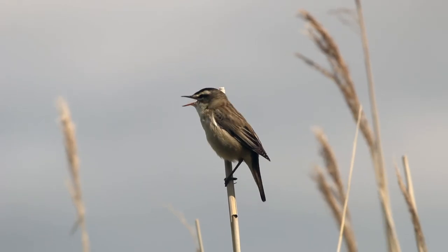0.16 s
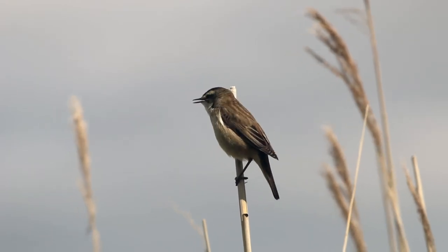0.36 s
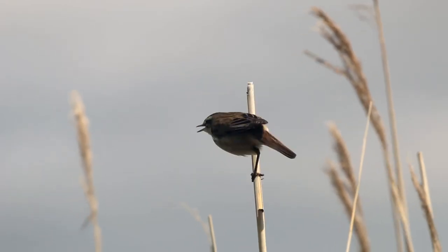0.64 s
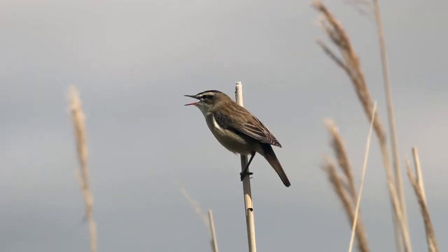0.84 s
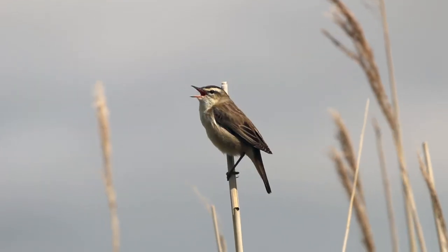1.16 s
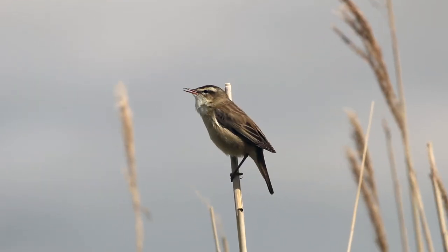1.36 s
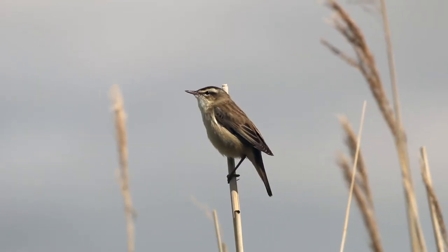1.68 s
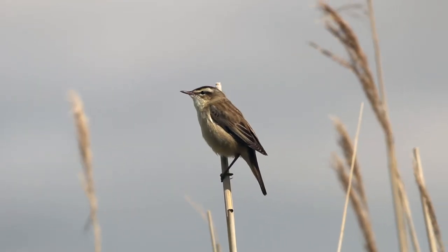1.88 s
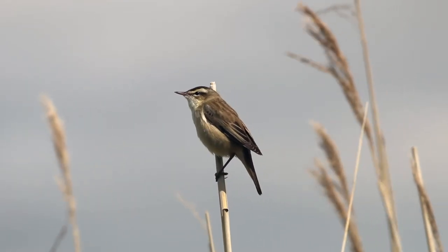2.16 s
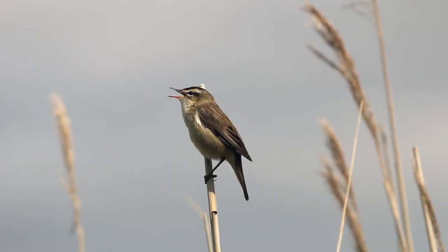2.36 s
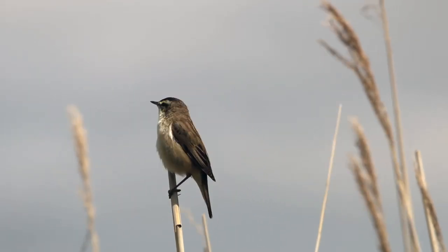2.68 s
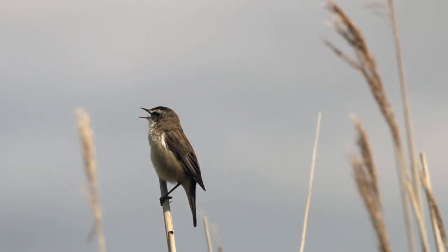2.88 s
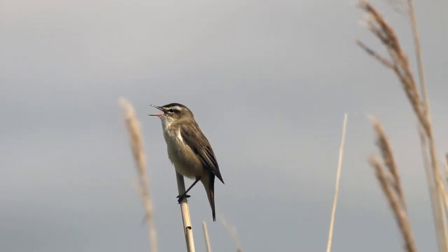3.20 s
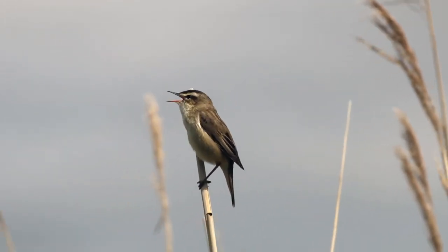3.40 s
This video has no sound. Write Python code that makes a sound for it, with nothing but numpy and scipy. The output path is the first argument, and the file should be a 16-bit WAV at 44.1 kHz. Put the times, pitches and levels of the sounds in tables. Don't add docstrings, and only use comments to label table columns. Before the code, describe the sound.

Reed warbler song of rapid buzzing trills, dry chatter and churrs, over distant throbbing gull cries

```python
import sys
import numpy as np
from scipy import signal
from scipy.fft import rfft, irfft, next_fast_len
from scipy.io import wavfile
from scipy.ndimage import uniform_filter1d

SR = 44100
rng = np.random.default_rng(int(sys.argv[2]) if len(sys.argv) > 2 else 0)


def unload_audio(sound):
    columns = np.transpose(np.atleast_2d(sound))
    steps = np.round(np.clip(columns, -1, 1) * 32767)
    wavfile.write(sys.argv[1], SR, steps.astype(np.int16))


def gain_from_db(level_db):
    decades = np.asarray(level_db, float) / 20
    return 10 ** decades


N = 156114

HOARSE_VOICE = [-37.5, 2, -18.5, -15.5, -19]


def curve(points, hz):
    p = np.array(points)
    return np.interp(np.log(np.abs(hz) + 1), np.log(1 + p[:, 0]), p[:, 1])


def unit(x):
    return x / np.sqrt(np.mean(x ** 2))


def wobble(n, rate_hz):
    k = max(int(SR / rate_hz), 1)
    noise = rng.standard_normal(n + 4 * k)
    smooth = uniform_filter1d(uniform_filter1d(noise, k), k)
    return unit(smooth[2 * k:2 * k + n])


def add(out, x, start_s):
    i = int(start_s * SR)
    a, b = max(i, 0), max(min(i + len(x), N), i)
    out[a:b] += x[a - i:b - i]


def stack(hz, partials_db, first, colour, rough, rate_hz):
    hz = hz * (1 + rough * wobble(len(hz), rate_hz))
    phase = 2 * np.pi * np.cumsum(hz) / SR
    voice = np.zeros(len(hz))
    for k, db in enumerate(partials_db, first):
        level_db = db + colour(k * hz) + 2.38 * wobble(len(hz), 256)
        voice += gain_from_db(level_db) * np.sin(k * phase + rng.uniform(0, 2 * np.pi))
    return voice


def echoes(x, t60_s, wet_db):
    t = np.arange(int(.4 * SR)) / SR
    tail = rng.standard_normal(len(t)) * gain_from_db(-60 * t / t60_s) * np.minimum(t / .006, 1)
    tail = tail / np.sqrt(np.sum(tail ** 2))
    return x + gain_from_db(wet_db) * signal.fftconvolve(x, tail)[:N]


def rasp(notes, pitch_hz, half_s, sag, width, rough, top_hz):
    out, u = np.zeros(N), np.linspace(-2.5, 2.5, int(5 * half_s * SR))
    gate = np.exp(-np.abs(u) ** 3.24 * np.where(u < 0, 1.1, .7))
    for middle_s, db, beak_hz in notes:
        beak = beak_hz * (1 - sag * u)

        def colour(f):
            resonance = -6.5 * (np.log(np.abs(f / beak)) / width) ** 2
            return resonance - 22 * np.maximum(f - top_hz, 0) / 1000

        pitch = pitch_hz * rng.uniform(.92, 1.2) * (1 - .5 * sag * u)
        buzz = stack(pitch, [-9, 0] * 11, 1, colour, rough, 1170)
        add(out, gain_from_db(db + 1.5) * gate * unit(buzz), middle_s - 2.5 * half_s)
    return out


def cries(table, partials_db, rough, throb, throb_hz, gap, arch=.17):
    out = np.zeros(N)
    for middle_s, length_s, hz, db, glide in table:
        u = np.linspace(-1.4, 1.4, int(1.4 * length_s * SR))
        turns = np.cumsum(throb_hz * (1 + .1 * wobble(len(u), 30))) / SR
        beat = -np.cos(2 * np.pi * (turns - turns[len(u) // 2]))
        pitch = .5 * hz * (1 + .5 * glide * u - arch * .5 * u ** 2 + .25 * rough * beat)
        chop = 1 - throb * np.exp(-(1 + beat) / gap)
        cry = stack(pitch, partials_db, 1, lambda f: 0, rough, 420)
        swell = np.exp(-1.2 * np.abs(u) ** 3.5)
        add(out, gain_from_db(db + 3.0) * swell * chop * cry, middle_s - .7 * length_s)
    return out


def reeds():
    # pitch_hz, level_db
    hiss_colour = [
        (30, -30),
        (140, -9),
        (470, -6.5),
        (1700, -5.5),
        (3300, -10.5),
        (7500, -25.5),
        (10500, -34),
        (16000, -42),
    ]
    size = next_fast_len(N, True)
    hz = np.maximum(np.fft.rfftfreq(size, 1 / SR), 1)
    hiss, swell = np.zeros(N), wobble(N, 4.0)
    for mid_hz in 25 * 2 ** np.arange(0, 9.6, 1 / 3):
        band = np.cos(np.pi / 2 * np.clip(3 * np.log2(hz / mid_hz), -1, 1))
        shape = band * gain_from_db(curve(hiss_colour, hz))
        noise = irfft(rfft(rng.standard_normal(size)) * shape, size)[:N]
        hiss += noise * gain_from_db(.5 * swell + 1.4 * wobble(N, 8))
    hum = 1 / (1 + ((hz - 536.5) / 25) ** 2)
    drone = unit(irfft(rfft(rng.standard_normal(size)) * hum, size)[:N])
    return gain_from_db(-38.5) * unit(hiss) + gain_from_db(-51 + 2.5 * wobble(N, 9.6)) * drone


def colony():
    # time_s, level_db
    bustle = [
        (0, -32.5),
        (.7, -38.5),
        (1.5, -32),
        (1.74, -48.5),
        (2.1, -31),
        (2.5, -42),
        (3.1, -33),
        (3.54, -35),
    ]
    c = rng.random((110, 5))
    table = np.c_[c[:, 0] * N / SR, .1 + .2 * c[:, 1], 1500 + 1100 * c[:, 2], -9 * c[:, 3], .2 * c[:, 4] - .1]
    murmur = cries(table, HOARSE_VOICE, 0.04915, 0.53, 61.9, 0.34)
    level_db = np.interp(np.arange(N) / SR, *np.array(bustle).T)
    return gain_from_db(level_db) * unit(murmur)


def chatter():
    # middle_s, level_db, beak_hz
    notes = [(0.0024, -23, 5450), (0.2339, -29, 6200), (0.7353, -23, 5270), (0.7668, -23, 5000),
             (0.7878, -20, 4530), (0.8818, -26.5, 4900), (0.899, -17.5, 5170), (0.9285, -18, 5000),
             (.9385, -41, 5130), (0.9513, -17, 4300), (1.512, -30, 5700), (2.3982, -20.5, 5100),
             (2.4283, -22.5, 5300), (2.4499, -21.5, 4700), (2.5795, -35, 6020), (2.5928, -22, 5250),
             (2.6231, -21.5, 4860), (2.6425, -23.5, 4400), (2.8, -29.5, 4900), (3.2259, -30, 6100)]
    return rasp(notes, pitch_hz=500, half_s=.0068, sag=0.0685, width=0.26, rough=0.0383, top_hz=7830)


def hoarse_gulls():
    # middle_s, length_s, main_partial_hz, level_db, glide_share
    calls = [(.055, 0.046, 2634, -30, -0.078), (1.385, .07, 2897, -35, .1), (3.12, .08, 3204, -33.5, -.1),
             (.12, .08, 2425, -28.5, -0.0038), (.36, 0.077, 2215, -31.5, 0.014),
             (.66, 0.17, 2150, -35.5, 0.028), (.5, .2, 2044, -43, 0), (1.02, 0.13, 2140, -42, -0.052),
             (.91, .14, 2370, -31.5, 0.015), (1.407, 0.089, 2240, -23.5, -0.013),
             (1.6, 0.081, 2460, -43, -0.031), (2.02, .18, 2070, -28, -0.063), (2.06, .08, 2320, -23, 0),
             (2.24, 0.092, 2302, -27.5, -0.069), (2.32, .13, 2335, -27, -0.044),
             (2.37, .12, 2060, -33, -0.04), (2.625, .17, 2283, -22.5, -0.025),
             (2.655, .17, 1984, -23.5, -0.044), (2.16, .12, 2510, -36, 0.0033),
             (2.96, .1, 2188, -25, 0.016), (3.06, 0.1, 2235, -27.5, -0.017), (3.14, 0.1, 2194, -28, 0),
             (3.255, .09, 2306, -26, 0.019), (3.4, 0.13, 3080, -38, -0.1)]
    return cries(calls, HOARSE_VOICE, rough=.055, throb=.9, throb_hz=64, gap=.5)


def churr():
    # middle_s, level_db, beak_hz
    notes = [(.0869, -19, 3800), (.1047, -18, 3900), (.1206, -18.5, 3460), (.1377, -26.5, 3860),
             (.4958, -26, 3840), (.5104, -27, 4060), (1.358, -31.5, 3000), (1.37, -27, 3120),
             (1.3789, -31, 3780), (1.3963, -19.5, 3580), (1.4133, -25.5, 3600), (1.4315, -47, 3360),
             (3.0924, -21.5, 4740), (3.1079, -20, 4120), (3.1251, -28, 3640), (3.1424, -36, 3840)]
    return rasp(notes, pitch_hz=650, half_s=.004, sag=0.041, width=0.33, rough=0.048, top_hz=5120)


def snaps():
    # start_s, level_db
    ticks = [(0.1037, -47), (0.4903, -42.5), (0.835, -46), (0.8939, -37), (0.9263, -61), (1.0964, -58),
             (1.1373, -48), (1.1772, -48), (1.2204, -60), (2.398, -62), (2.5925, -49), (2.9644, -61),
             (3.4321, -56)]
    out = np.zeros(N)
    for start_s, db in ticks:
        noise = uniform_filter1d(rng.standard_normal(25), 2)
        add(out, gain_from_db(db) * unit(np.diff(noise) * np.hanning(24)), start_s)
    return out


def bumps():
    # start_s, peak_db, pitch_hz
    thumps = [
        (0.128, -33.5, 137),
        (1.849, -40, 138),
        (2.672, -41, 109),
        (2.996, -34, 141),
        (3.171, -36.5, 132),
        (3.428, -43, 153),
    ]
    out, t = np.zeros(N), np.arange(.08 * SR) / SR
    swell = (t / 0.0075) * np.exp(-t / 0.0065)
    for start_s, db, hz in thumps:
        add(out, gain_from_db(db + 10.5) * swell * np.sin(2 * np.pi * hz * t * (1 - 4.5 * t)), start_s)
    return out


def trill():
    # arch_top_s, level_db, top_pitch_hz
    notes = [(0.2544, -15, 933), (0.2944, -17, 927), (0.331, -16.5, 916), (0.369, -17.5, 916),
             (0.4094, -20, 895), (1.1052, -16, 934), (1.143, -14, 941), (1.182, -15, 910),
             (1.2148, -14.5, 930), (1.2552, -16.5, 971), (1.2919, -19.5, 940), (1.5303, -16.5, 943),
             (1.566, -15, 924), (1.604, -14, 915), (1.6415, -14.5, 943), (1.6796, -18, 897),
             (2.8178, -22.5, 880), (2.8514, -17, 885), (2.89, -18.5, 900), (2.9252, -17, 953),
             (2.962, -17.5, 931), (2.9995, -17.5, 935), (3.2444, -16.5, 920), (3.2758, -17.5, 910),
             (3.3187, -19, 936), (3.3524, -17.5, 910), (3.3926, -17.5, 915), (3.4287, -16.5, 936),
             (3.4637, -18, 949)]
    partials_db = [-18.5, -7, -33, 0.5, -3.5, -3.5, -14.5, -25.5, -34]
    # pitch_hz, level_db
    windpipe = [
        (2500, 2),
        (3400, -19),
        (3720, -3.5),
        (4250, -4),
        (4650, 2.5),
        (7600, -10.5),
        (8400, -11.5),
        (12000, -1),
    ]
    rise_s, fall_s, rise_drop, fall_drop = .014, .008, .15, .12
    out, t = np.zeros(N), np.arange(-.024 * SR, .014 * SR) / SR
    rise = rise_drop * (np.abs(t) / rise_s) ** 1.42
    arch = 1 - np.where(t < 0, rise, fall_drop * (t / fall_s) ** 2)
    gate = np.clip((t + .0175) / .011, 0, 1) * (1 + 10 * t) * np.clip((.008 - t) / .006, 0, 1)
    for top_s, db, hz in notes:

        def colour(f):
            dulling_db = 9 * min(db + 16.5, 0)
            return curve(windpipe, f) + dulling_db * np.clip((f - 7200) / 500, 0, 1)

        tone = stack(hz * arch, partials_db, 3, colour, .007, 753)
        breath = stack(hz * arch, partials_db, 3, colour, 0.069, 753)
        add(out, gain_from_db(db + 0.5) * gate * (tone + gain_from_db(-8) * breath), top_s + t[0])
    return out


def high_calls():
    # middle_s, length_s, pitch_hz, level_db
    calls = [(0.77, 0.18, 3540, -43), (.62, .15, 3300, -38.5), (0.78, 0.18, 4500, -43),
             (1.9, 0.14, 5400, -43.5), (.88, 0.067, 2930, -32), (2.06, .14, 4780, -44),
             (2.7, 0.15, 6200, -46.5), (2.31, .08, 4300, -31.5), (2.32, 0.091, 5100, -41),
             (3, 0.044, 5950, -32), (2.03, .02, 5800, -35), (1.96, 0.056, 6600, -50.5),
             (1.7, 0.044, 6800, -37), (3.15, 0.053, 5300, -47), (3.03, 0.1, 4200, -34.5),
             (3.17, 0.087, 4400, -39.5)]
    table = np.c_[calls, np.zeros(len(calls))]
    return cries(table, [-30, 0], rough=0.0312, throb=0.75, throb_hz=60, gap=0.34, arch=0.025)


def clear_gulls():
    # middle_s, length_s, main_partial_hz, level_db, glide_share
    calls = [(1.251, .135, 2005, -18, -0.035), (1.33, 0.063, 1780, -30, -.12),
             (1.63, .17, 1762, -34.5, 0.017), (1.85, 0.082, 1753, -32, 0.021),
             (2.17, 0.17, 1653, -39.5, -0.12), (3.08, 0.059, 1667, -27.5, -0.027),
             (3.29, 0.1, 1333, -30.5, -.08), (3.43, .11, 2040, -29.5, -.07), (3.52, .12, 1959, -28.5, .03),
             (1.0, .1, 1190, -41, 0.002), (3.44, 0.031, 666, -34, -0.16)]
    partials_db = [-31, 3, -12, -12, -17]
    return cries(calls, partials_db, rough=.02, throb=1, throb_hz=52, gap=.6)


def scene():
    warbler = chatter() + churr() + trill()
    distance = colony() + hoarse_gulls() + high_calls() + clear_gulls()
    near = echoes(warbler, t60_s=.15, wet_db=-8)
    far = echoes(distance, t60_s=.25, wet_db=-11)
    return (near + far + reeds() + bumps() + snaps())[None]


def low_pass(x):
    return signal.sosfilt(signal.butter(12, 15830, fs=SR, output="sos"), x)


def record(dry):
    return low_pass(dry)


dry = scene()
out = record(dry)
unload_audio(out)
```